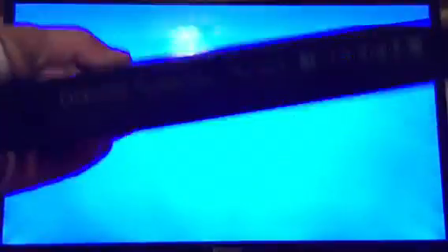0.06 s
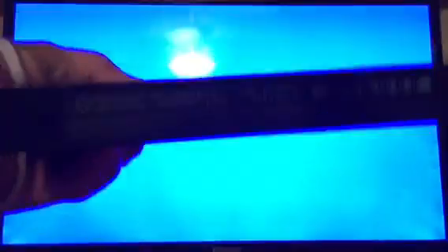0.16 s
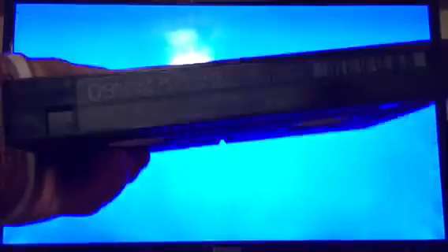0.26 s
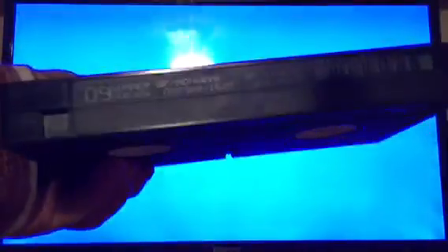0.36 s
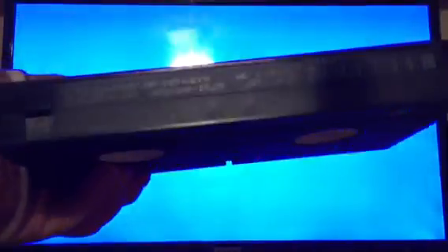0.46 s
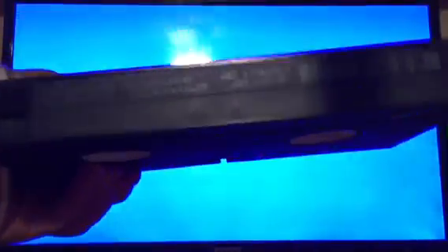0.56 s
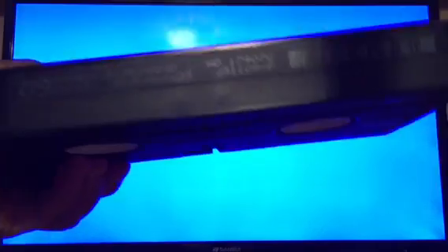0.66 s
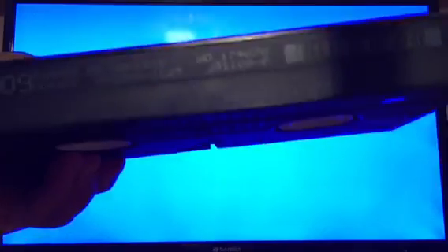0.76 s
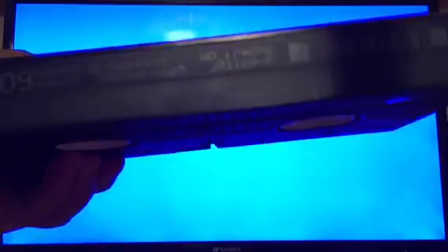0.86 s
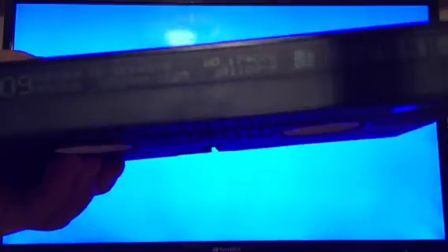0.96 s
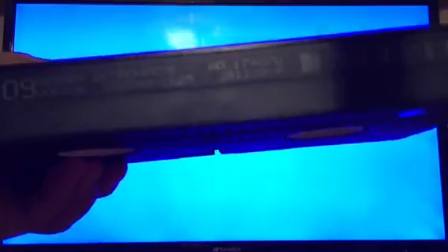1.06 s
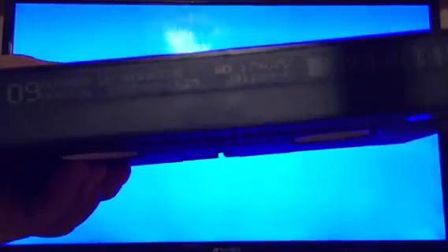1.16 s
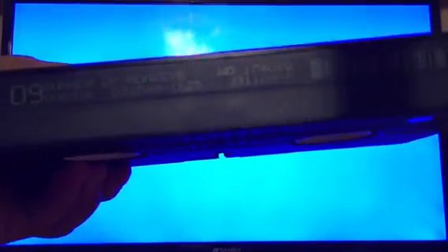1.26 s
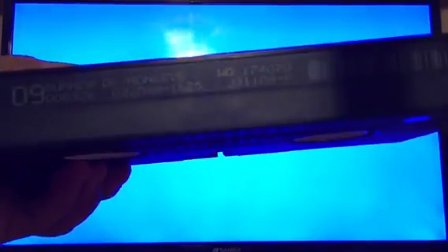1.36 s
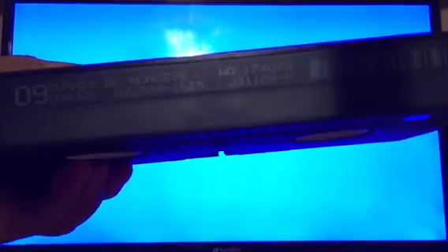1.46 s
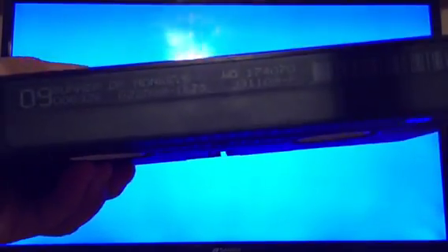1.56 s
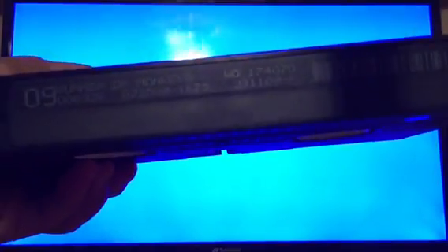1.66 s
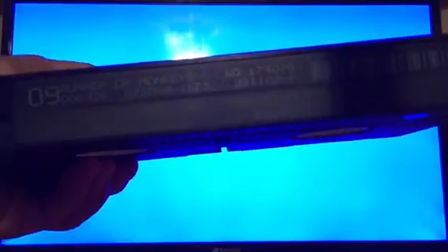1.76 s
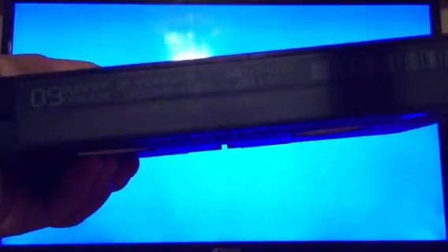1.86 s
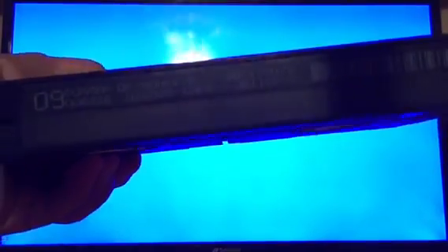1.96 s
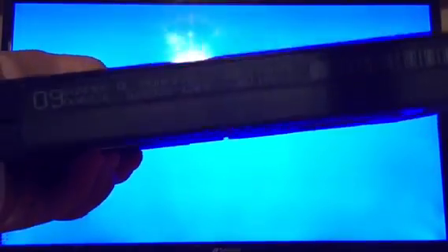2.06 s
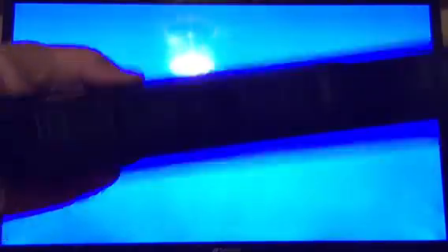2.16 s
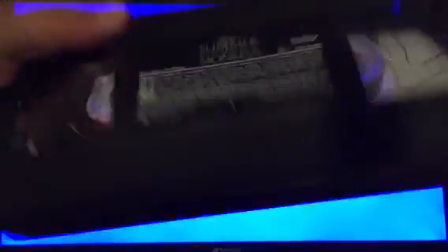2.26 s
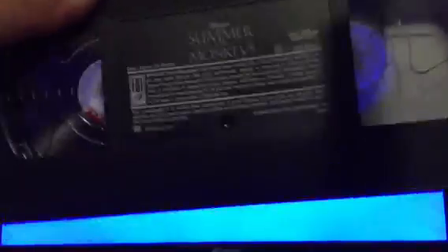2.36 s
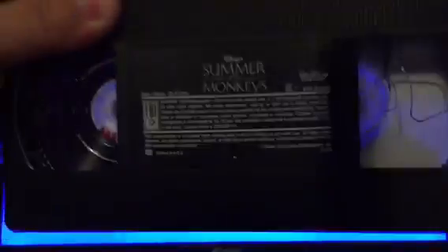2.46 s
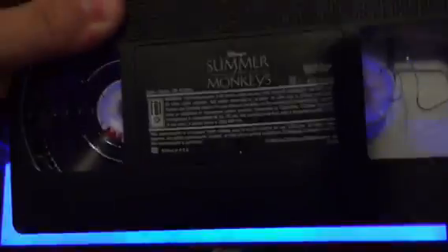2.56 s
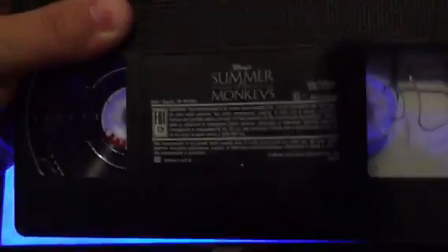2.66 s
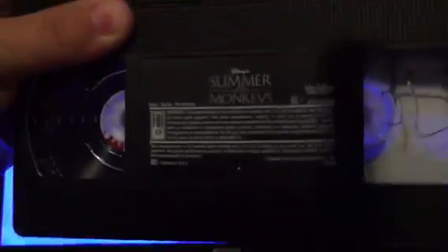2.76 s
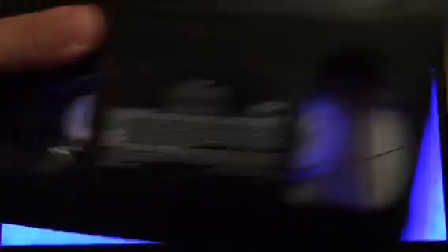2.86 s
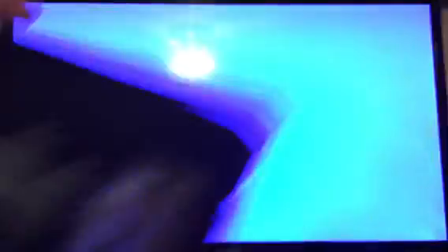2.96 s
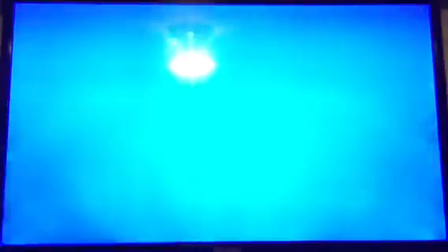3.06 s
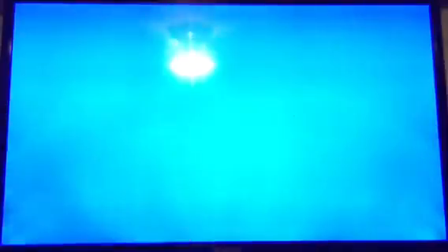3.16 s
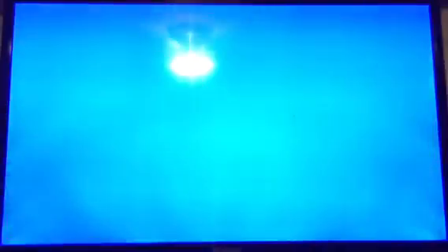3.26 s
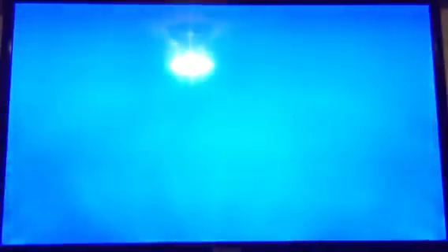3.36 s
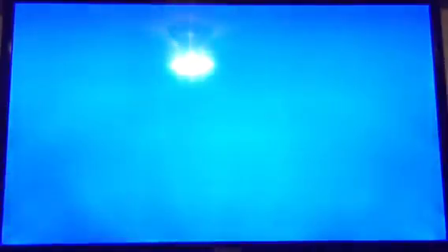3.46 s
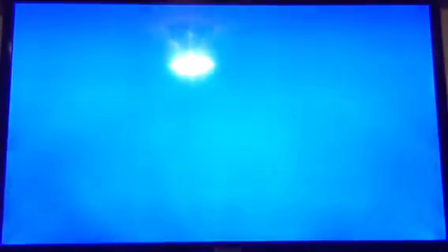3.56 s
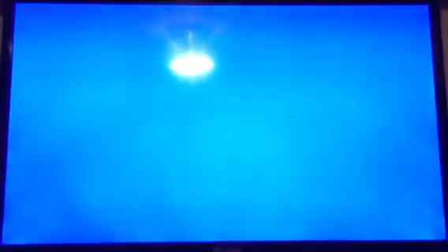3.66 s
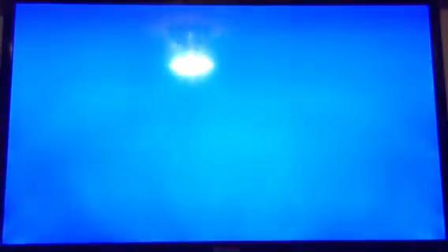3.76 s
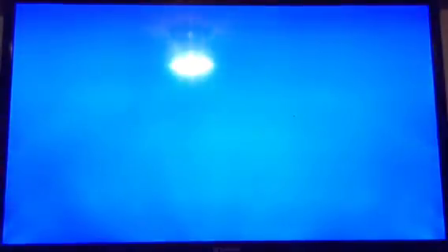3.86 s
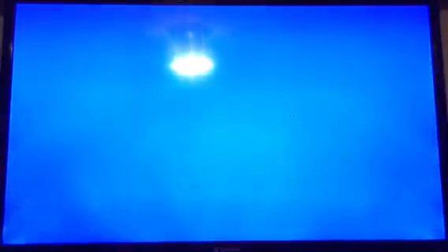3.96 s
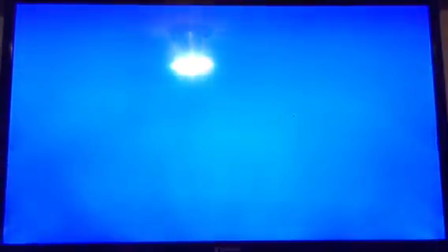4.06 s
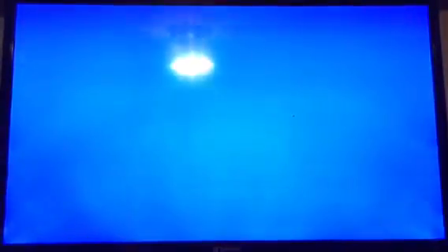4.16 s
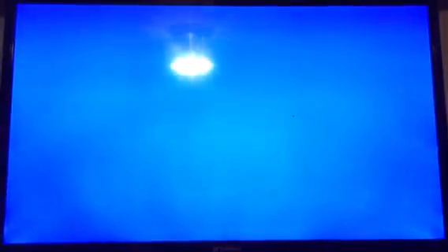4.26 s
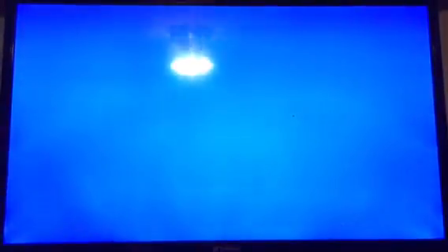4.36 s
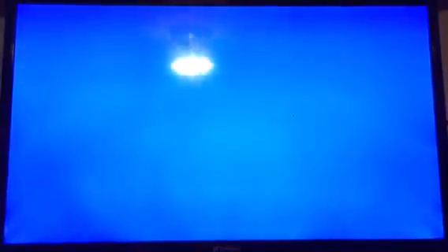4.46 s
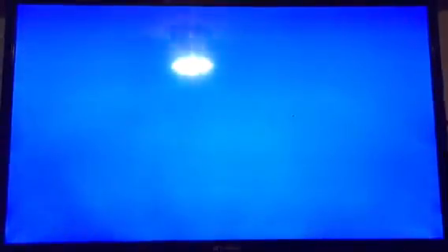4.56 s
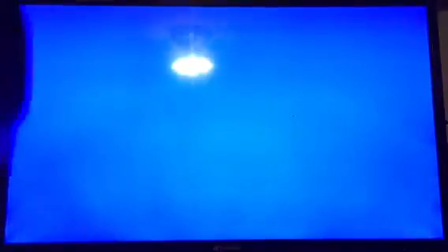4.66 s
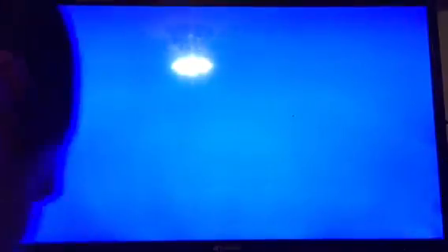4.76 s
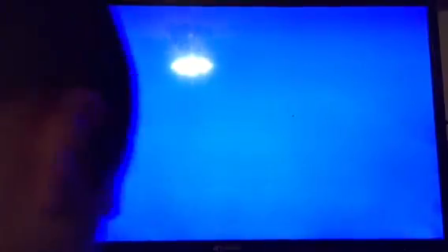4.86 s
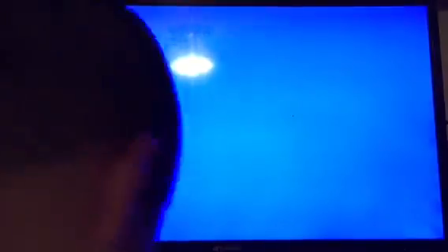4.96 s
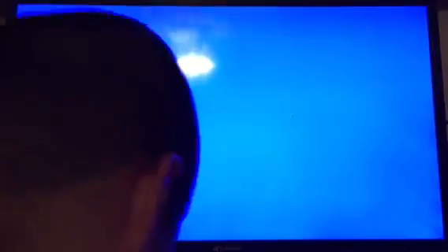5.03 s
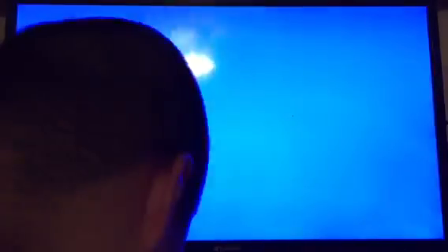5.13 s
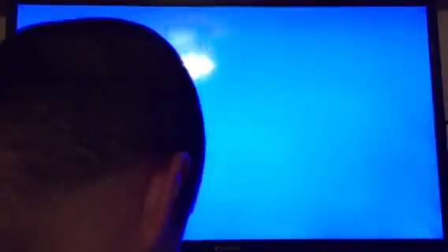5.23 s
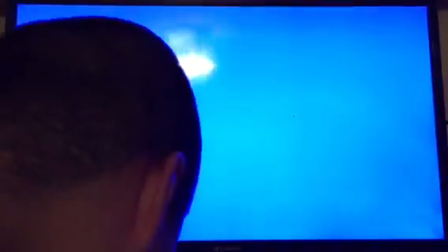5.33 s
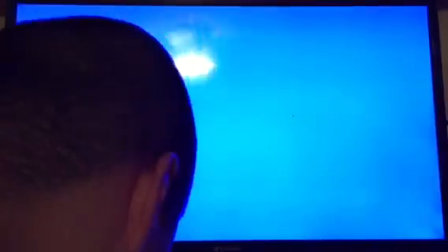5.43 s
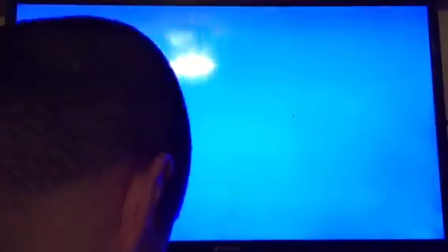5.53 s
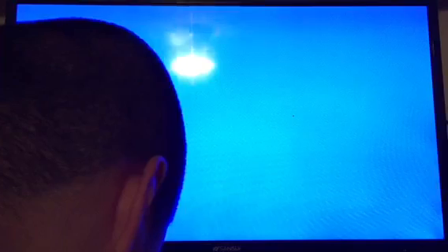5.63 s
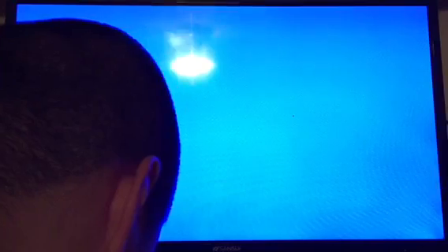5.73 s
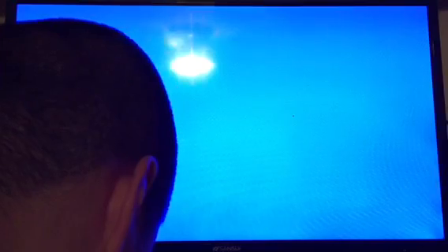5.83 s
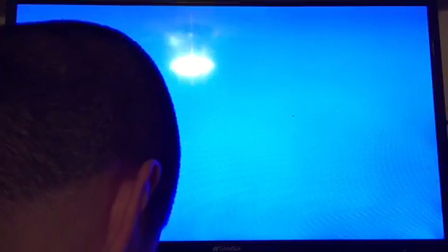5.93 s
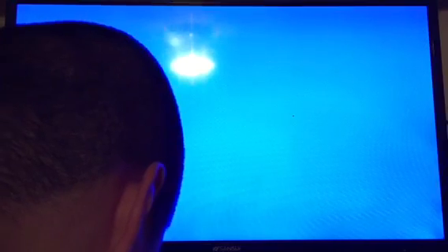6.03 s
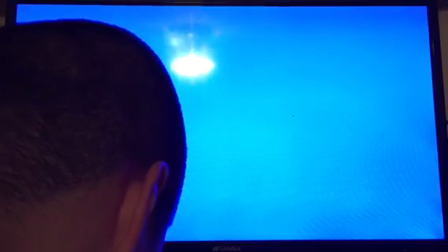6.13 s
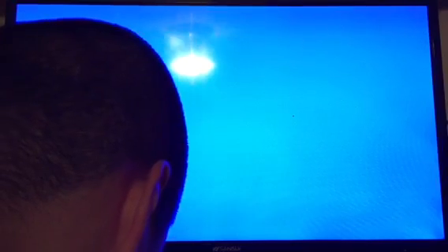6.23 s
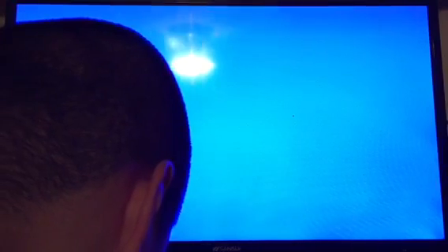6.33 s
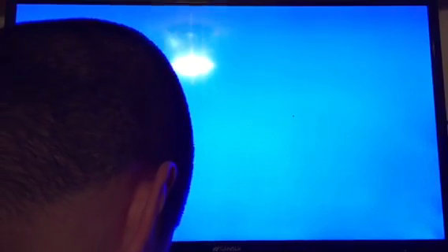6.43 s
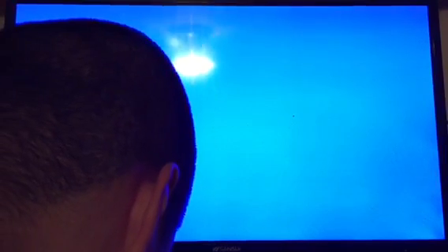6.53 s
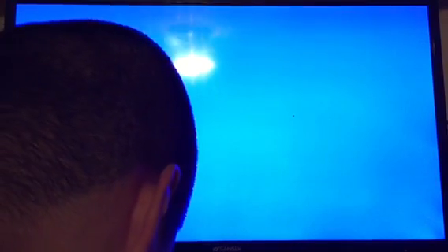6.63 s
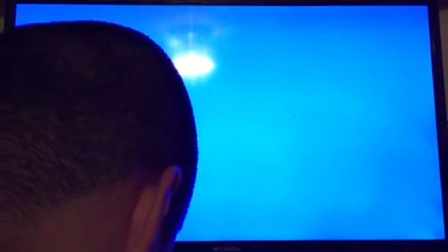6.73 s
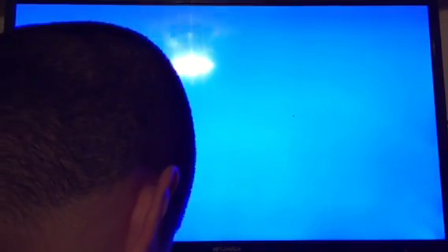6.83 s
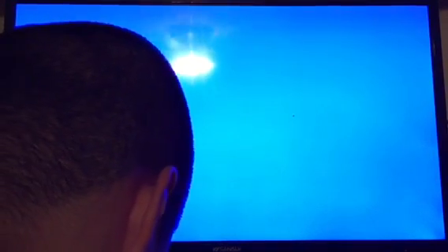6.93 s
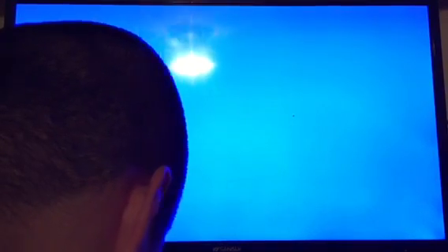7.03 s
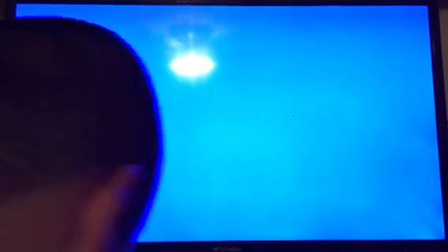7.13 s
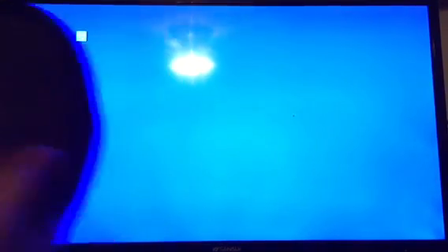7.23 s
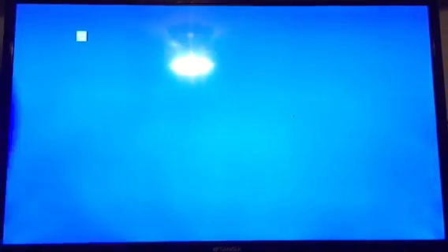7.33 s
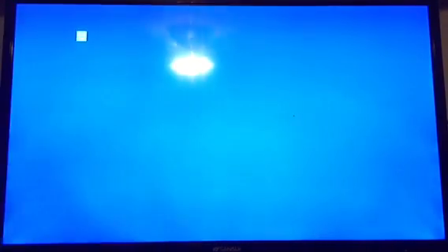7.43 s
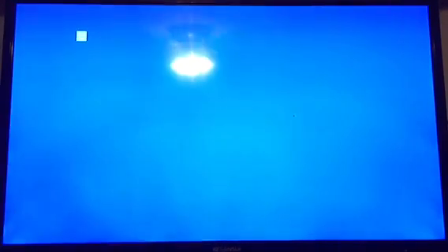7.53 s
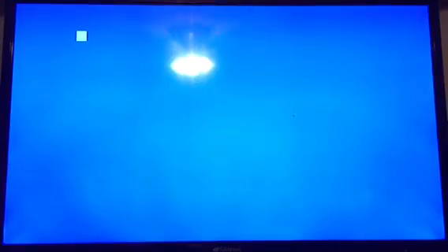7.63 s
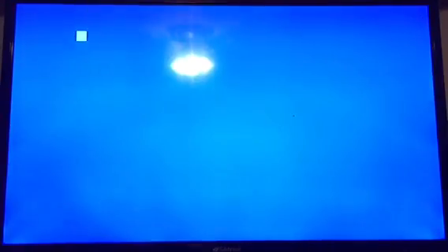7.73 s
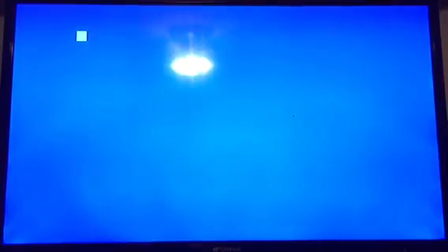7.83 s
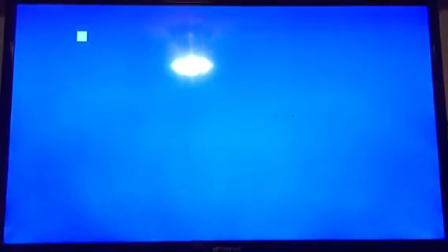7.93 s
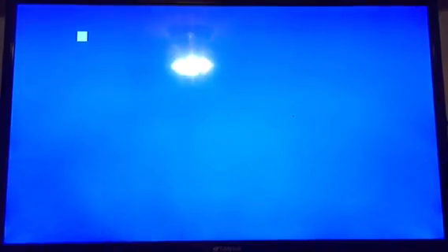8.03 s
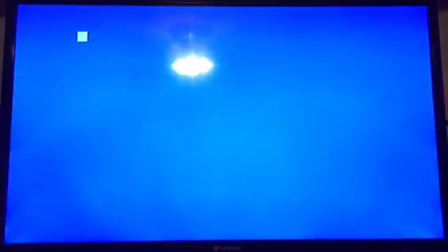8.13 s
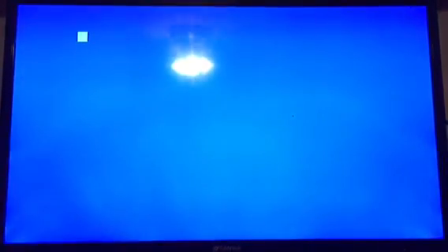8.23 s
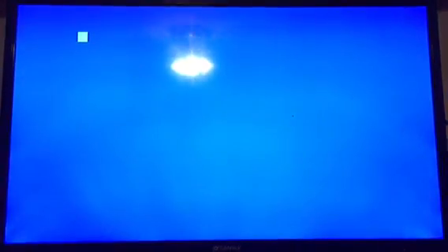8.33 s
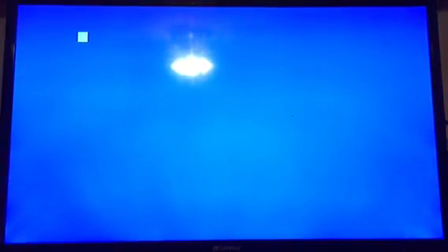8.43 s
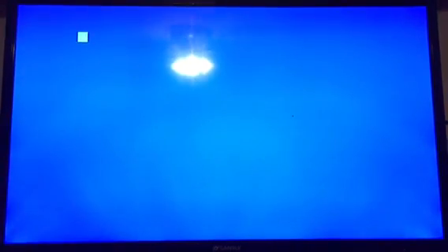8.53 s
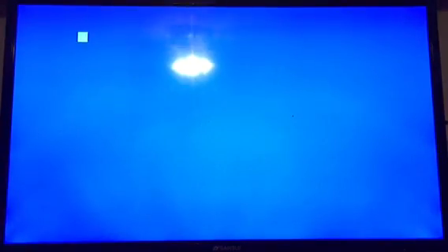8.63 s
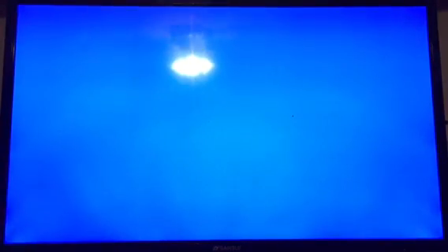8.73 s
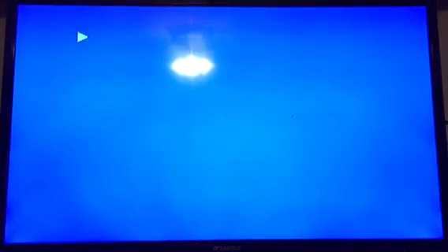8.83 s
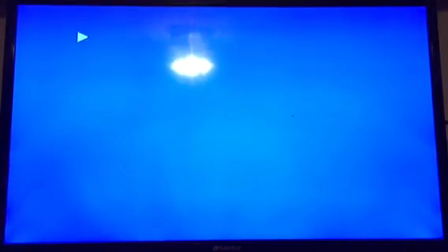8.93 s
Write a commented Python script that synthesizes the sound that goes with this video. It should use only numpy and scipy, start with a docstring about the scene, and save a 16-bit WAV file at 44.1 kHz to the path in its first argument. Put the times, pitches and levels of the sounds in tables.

```python
"""A video cassette is pushed into a player: it knocks the tray, scrapes and squeaks along the slot,
and the metal case booms. Impacts and friction supply the force; the resonances of each body colour it.
Beforehand the cassette clicks and rustles in the hand; afterwards the player's loading parts click,
with soft brushing near the microphone. A small room reverberates, over a faint mains hum,
a fan and a thin motor whine."""
import sys
import numpy as np
from scipy import signal
from scipy.fft import rfft, irfft, next_fast_len
from scipy.io import wavfile
from scipy.ndimage import uniform_filter1d, map_coordinates

SR = 44100
rng = np.random.default_rng(int(sys.argv[2]) if len(sys.argv) > 2 else 0)


def transcribe(u):
    """Save the signal u as a 16-bit wav file named by the first command-line argument.

    u: samples, shape (n,) or (channels, n), limited to [-1, 1]; the rate is SR.
    q: integer samples, one column per channel.
    """
    v = np.clip(np.atleast_2d(u).T, -1, 1)
    q = np.round(v * 32767).astype(np.int16)
    wavfile.write(sys.argv[1], SR, q)


N = 396459
TIME = np.arange(N) / SR
FRAME, ONSET_S = 32768, .025  # samples computed for one contact; time of the blow within them
LN_1000 = np.log(1000)  # amplitude decay of 60 dB

# resonances of the cassette's shell: f/Hz, bandwidth/Hz, gain/dB
SHELL_MODES = [(372, 36, 4), (585, 30, 4), (770, 150, 6.5), (963, 42, 9), (1285, 50, 6.5), (1826, 64, 9),
               (2100, 120, 5), (2360, 110, 3.5), (2750, 60, -5.5), (3140, 69, -2), (5500, 290, 7),
               (6024, 87, 10), (6710, 100, 11), (9320, 720, 8.5)]
# resonances of the player's case and tray: f/Hz, bandwidth/Hz, gain/dB
CASE_MODES = [(147, 17, 0.5), (201.5, 11, 1), (296, 16, 2.5), (303, 10.5, 3.5), (648, 28, 9.5),
              (696, 12, 5.5), (813, 22, 6), (875, 51, 3), (930, 2.4, 1), (1010, 27, 3.5), (1145, 22, 2.5),
              (1510, 3.6, -2), (1860, 15, 5), (2155, 7, 9), (2010, 29, -9), (2310, 16, -11), (2420, 16, 6),
              (6230, 770, 1)]
# the cassette slides in and is drawn down, one list a stroke: t/s, scrape level/dB, boom level/dB
STROKES = [
    [(5.2, -27.5, -32), (5.38, -44.5, -49), (5.54, -36.5, -39), (5.636, -45, -54), (5.694, -33, -53),
     (5.782, -65, -37.5), (5.828, -70, -42), (5.92, -97, -75)],
    [(6.06, -52, -60), (6.162, -56, -60), (6.272, -76, -62), (6.42, -76, -68)],
    [(6.68, -59, -55), (6.758, -57.5, -55), (6.952, -69, -51.5), (7.16, -48, -42.5), (7.276, -47, -42),
     (7.33, -42.5, -33), (7.428, -46, -38), (7.486, -54.5, -49), (7.62, -72, -49.5)],
    [(8.18, -67, -62), (8.5, -72, -60.5), (8.72, -65, -54), (8.99, -79, -66)],
]
# spectrum of a contact: f/Hz, click level/dB, knock level/dB, share of weight, share of brightness
CONTACT_SPECTRUM = [(235, -3, 8.5, 0.79, 0.28), (800, 1, 5, 0.5, 0), (2640, -0.5, -0.5, 0, 0.02),
                    (4200, -4, -5, 0, 0.42), (5800, -12.5, -9, 0.2, 0.66), (9900, -23, -16.5, 0.22, 1.1),
                    (14000, -22.5, -21.5, 0.089, 1.5)]


def amp(db):
    """Amplitude ratio of a level in decibels."""
    return 10 ** (np.asarray(db) / 20)


def unit(x):
    """Normalisation to rms 1."""
    return x / np.sqrt(np.mean(x ** 2) + 1e-20)


def along(points, hz):
    """Interpolation of (f/Hz, value) points on a logarithmic frequency axis."""
    f, values = np.transpose(points)
    return np.interp(np.log(hz + 1), np.log(f + 1), values)


def wobble(rate):
    """Smooth random modulation: a spline through `rate` random knots a second."""
    knots = rng.standard_normal(int(N * rate / SR) + 4)
    return map_coordinates(knots, [TIME * rate])


def filtered(x, gain):
    """Zero-phase filtering: the spectrum of x is multiplied by gain(f)."""
    size = next_fast_len(N + SR // 2)
    return irfft(rfft(x, size) * gain(np.fft.rfftfreq(size, 1 / SR)), size)[:N]


def resonant(modes, hz):
    """Gain of a resonator: Lorentzian peaks add in power above a flat response."""
    peaks = sum(amp(db) ** 2 / (1 + (2 * (hz - centre) / width) ** 2) for centre, width, db in modes)
    return np.sqrt(1 + peaks)


def coloured(force, spectrum, modes=()):
    """Source and filter: a force shaped by a broad spectrum and any resonances, at rms 1."""
    return unit(filtered(force, lambda hz: amp(along(spectrum, hz)) * resonant(modes, hz)))


def causal(gain):
    """Causality: the minimum-phase response with this gain rings only after the blow."""
    cepstrum = irfft(np.log(np.maximum(gain, 1e-6)))
    cepstrum[1:FRAME // 2] *= 2
    cepstrum[FRAME // 2 + 1:] = 0
    return np.exp(rfft(cepstrum))


def add(track, start, sound):
    """Superposition of a sound on the track from `start` seconds."""
    part = track[max(round(start * SR), 0):][:len(sound)]
    part += sound[:len(part)]


def background():
    """Broadband fan noise under a line spectrum: mains, fan and motor tones of wavering phase."""
    # noise of fan and room: f/Hz, relative level/dB
    air_spectrum = [(25, -40), (45, -10), (92, -8), (125, -5.5), (205, -4), (270, -8), (335, -10),
                    (430, -13.5), (1020, -12.5), (1560, -18), (2000, -17), (2690, -24.5), (6000, -32),
                    (16000, -39)]
    # mains and fan tones: f/Hz, relative level/dB
    hum_lines = [(60, -74), (120, -79), (333, -78), (996, -80), (1163, -83), (1497, -84), (1830, -86)]
    # a small motor, loudest once the player is in use: t/s, level/dB
    whine_levels = [(0, -79.5), (4.5, -76), (6, -78.5), (7.5, -65), (8.1, -75), (9, -71)]

    def tone(hz):
        return np.sqrt(2) * np.sin(2 * np.pi * hz * TIME + 0.99 * wobble(7.3))

    air = coloured(rng.standard_normal(N), air_spectrum)
    hum = sum(amp(db) * tone(hz) for hz, db in hum_lines)
    whine = amp(np.interp(TIME, *np.transpose(whine_levels))) * tone(hz=1330)
    return amp(-64.5) * air + amp(1.5) * hum + whine


def room_tail(build_s):
    """Reverberation: a diffuse field of energy 1 builds up and decays, the treble first."""
    # reverberation time of the room: f/Hz, T60/s
    decay_times = [(100, 0.58), (300, 0.41), (800, 0.31), (2500, 0.35), (6000, 0.28), (14000, 0.25)]
    hz, t, noise = signal.stft(rng.standard_normal(FRAME), SR, nperseg=256)
    decay = amp(-60 * t / along(decay_times, hz)[:, None])
    rise = 1 - np.exp(-(t / build_s) ** 2)
    _, tail = signal.istft(noise * decay * rise, SR)
    return unit(tail[:FRAME]) / np.sqrt(FRAME)


def friction(grain_db, grain_rate):
    """Stick-slip friction breaks noise into grains."""
    return rng.standard_normal(N) * amp(grain_db * wobble(grain_rate))


def brushing():
    """Friction of skin and cloth excites the plastic's modes and hisses over its texture."""
    # brief touches: t/s, duration/s, rub level/dB, hiss level/dB
    brushes = [(3.554, 0.19, -58.5, -53), (4.78, 0.073, -76, -56.5), (7.546, 0.18, -52.5, -60),
               (8.217, 0.36, -53, -61), (8.305, 0.041, -71, -76), (8.33, 0.056, -52, -74),
               (8.796, 0.14, -67, -50.5), (8.892, 0.14, -56.5, -76)]
    # skin rubbing on plastic: f/Hz, relative level/dB
    rub_spectrum = [(200, -3), (700, 4), (1400, 5), (2300, 6.5), (4000, -2), (7000, -18.5), (15000, -21.5)]
    # hiss of the sleeve: f/Hz, relative level/dB
    sleeve_spectrum = [(500, -29), (2000, 8), (4000, 1.5), (7000, 1), (10000, -3.5), (15000, -5)]
    rub = coloured(friction(grain_db=3.5, grain_rate=260), rub_spectrum, SHELL_MODES)
    hiss = coloured(rng.standard_normal(N), sleeve_spectrum)
    out = np.zeros(N)
    for start, length, rub_db, hiss_db in brushes:
        envelope = np.interp((TIME - start) / length, [0, .2, .65, 1], [0.0015, 0.41, 0.24, 0.032])
        out += envelope * (amp(rub_db) * rub + amp(hiss_db) * hiss)
    return out


def squeaks():
    """Self-excited oscillation: stick and slip lock briefly onto one resonance of the tray."""
    # the shell catching on the guides: t/s, duration/s, f/Hz, peak level/dB
    catches = [(5.246, 0.023, 1125, -28), (5.267, 0.039, 1156, -29.5)]
    out = np.zeros(N)
    for start, length, hz, db in catches:
        envelope = np.interp((TIME - start) / length, [0, .3, .6, 1], [0.0016, 0.83, 1.0, 0.0038])
        out += amp(db) * envelope * np.sin(2 * np.pi * hz * TIME + 0.55 * wobble(200))
    return out


def jolts(per_second=9, boost_db=4):
    """Random excitation by the moving cassette, following the boom: rows of t/s, f/Hz, level/dB."""
    # low modes of the case: f/Hz, relative level/dB
    low_modes = [(128, 3), (308, -1)]
    rows = []
    for stroke in STROKES:
        times, _, boom_db = np.transpose(stroke)
        for slot, (late, pick) in enumerate(rng.random((32, 2))):
            start = times[0] + (slot + late) / per_second
            hz, db = low_modes[int(pick * len(low_modes))]
            if start < times[-1]:
                rows.append((start, hz, db + boost_db + np.interp(start, times, boom_db)))
    return rows


def bumps(attack_s=0.012):
    """Damped oscillation: each soft push or jolt rings one mode; the lower it is, the longer it rings."""
    # soft bumps of hands, case and shelf: t/s, f/Hz, level/dB
    pushes = [(0.918, 126, -53), (1.371, 127, -49.5), (2.986, 383, -43), (4.946, 94, -40),
              (5.013, 60.4, -34.5), (5.184, 311, -18.5), (5.188, 109, -30.5), (5.612, 145, -28),
              (5.663, 298, -25.5), (6.172, 310.5, -33), (6.289, 84.6, -44.5), (6.918, 316, -29.5),
              (6.921, 129, -41), (6.969, 344, -37.5), (7.275, 307, -33), (7.346, 125, -32),
              (7.432, 240, -36.5), (7.465, 56, -44), (7.719, 271, -24), (7.968, 133, -47.5),
              (8.209, 85, -51), (8.289, 46.7, -44.5), (8.644, 306, -41), (8.709, 106, -51.5),
              (8.809, 64, -50), (8.802, 233, -35.5), (8.839, 155, -44)]
    out, t = np.zeros(N), np.arange(SR // 2) / SR
    phase_drift = 0.81 * wobble(60)
    for start, hz, db in pushes + jolts():
        t60 = .105 * (300 / hz) ** 0.24
        envelope = (1 - np.exp(-t / attack_s)) * np.exp(-LN_1000 * t / t60)
        phase = 2 * np.pi * hz * t + np.roll(phase_drift, -round(start * SR))[:len(t)]
        add(out, start, 2 * amp(db) * envelope * np.sin(phase))
    return out


def sliding(ramp_s=0.043, gain_db=-5):
    """Forced vibration: the shell scrapes along the guides and shakes the hollow case."""
    # scraping in the guides: f/Hz, relative level/dB
    scrape_spectrum = [(260, -66.5), (450, -36), (664, 0), (1010, 0), (1680, 2), (3700, -11.5), (5970, -17),
                       (14200, -35), (16000, -56)]
    # boom of the case: f/Hz, relative level/dB
    boom_spectrum = [(40, -19), (80, -8), (125, 2), (200, -5), (330, -1.5), (430, -8.5), (700, -34),
                     (2000, -98)]
    scrape_envelope, boom_envelope = np.zeros(N), np.zeros(N)
    for stroke in STROKES:
        times, scrape_db, boom_db = np.transpose(stroke)
        touching = np.clip(np.minimum(TIME - times[0], times[-1] - TIME) / ramp_s, 0, 1)
        scrape_envelope += touching * amp(np.interp(TIME, times, scrape_db))
        boom_envelope += touching * amp(np.interp(TIME, times, boom_db))
    scrape = coloured(friction(grain_db=2.5, grain_rate=160), scrape_spectrum, CASE_MODES)
    boom = coloured(friction(grain_db=-2, grain_rate=48), boom_spectrum, CASE_MODES)
    return amp(gain_db) * (scrape_envelope * scrape + boom_envelope * boom)


def treble_ripple(hz, depth_db=4.0, spacing_hz=222.5):
    """Spectral colouration: a fine random ripple in the treble gives each contact its own timbre."""
    ripple = map_coordinates(rng.standard_normal(FRAME // 32), [hz / spacing_hz], mode="mirror")
    return amp(depth_db * np.clip(hz / 3000, 0, 1) * ripple)


def contacts(events, modes, tone, plain_db, settle_s, settle_power, spiky, spot_q, spot_db,
             room_db, build_s):
    """Impact excitation: bursts of tiny blows ring body and room; weight adds bass, brightness treble."""
    out, t, hz = np.zeros(N), np.arange(FRAME) / SR - ONSET_S, np.fft.rfftfreq(FRAME, 1 / SR)
    body = resonant(modes, hz) * amp(along(tone, hz)) / np.hypot(1, amp(room_db))
    band_hz, _, _, weight_share, bright_share = np.transpose(CONTACT_SPECTRUM)
    for when, rise_s, db, weight_db, bright_db, spot_hz in events:
        # the parts graze, meet and settle; a rise of 2 ms takes settle_s to die away, a slower one longer
        t60 = settle_s * (rise_s / .002) ** settle_power
        envelope = np.exp(np.minimum(t / rise_s, -LN_1000 * t / t60))
        chatter = rng.standard_normal(FRAME)
        spikes = np.exp(spiky * np.repeat(rng.standard_normal(FRAME // 16), 16))
        burst = rfft(chatter * spikes * envelope)
        # divided by its smoothed magnitude, the burst feeds all bands evenly
        magnitude = np.sqrt(np.abs(uniform_filter1d(np.abs(burst) ** 2, size=401)) + 1e-12)
        spot = resonant([(spot_hz, spot_hz / spot_q, spot_db)], hz)
        direct = burst * causal(spot * treble_ripple(hz) / magnitude)
        # the room gathers radiation from all directions, so the spot's resonance stands out less
        tail = np.roll(room_tail(build_s), round(ONSET_S * SR))
        reverberant = amp(room_db) * rfft(tail) * causal(spot ** 0.44)
        band_db = plain_db + weight_db * weight_share + bright_db * bright_share
        colour = amp(db + along(list(zip(band_hz, band_db)), hz))
        sound = irfft((direct + reverberant) * causal(body * colour))
        add(out, when - ONSET_S, sound[:FRAME * 3 // 4])
    return out


def plastic_clicks():
    """Light impacts ring the modes of the plastic; direct sound dominates over the room."""
    # loose reels and dust flap of the hand-held cassette and, later, the player's loading parts:
    # t/s, rise time/s, level/dB, weight/dB, brightness/dB, f/Hz of the touched spot
    clicks = [(0.143, 0.00013, -18, -10, 7, 2100), (0.202, 0.00069, -10, -11, -1, 790),
              (0.244, 0.0015, -5.5, -9, -1, 2750), (0.563, .0005, -33, 10, -2, 2380),
              (0.999, 0.00069, -24, -3, -3, 2470), (2.376, 0.0047, -11.5, 0, -1, 7300),
              (2.429, 0.0023, -3, -13, -6, 2390), (2.486, 0.0013, -9, -3, 3.5, 2370),
              (2.967, 0.0044, -9.5, -3, -8, 2300), (2.989, 0.00073, -15, 20, -10, 2220),
              (3.096, 0.005, -23.5, 9, -4, 5720), (3.134, 0.0039, -12.5, -15, -12, 1960),
              (3.182, .0003, -33, -13, 16.5, 2690), (3.224, .003, -14, -11, -6, 3760),
              (3.254, 0.0012, -23.5, 0, 3, 5900), (3.366, 0.0014, -16, -8, -7, 2340),
              (3.465, 0.00085, -5.5, 10.5, -5, 2060), (3.584, 0.00074, -19, 1, 7.5, 661),
              (3.648, 0.011, -8, -7, 1.5, 720), (3.805, 0.0036, -22, 14.5, 2.5, 5430),
              (3.872, 0.0021, -9, 0, -2.5, 1120), (3.8832, 0.00015, 8, -0.5, 9.5, 6020),
              (4.181, 0.0016, -29.5, 0.5, 1, 3220), (8.467, .003, -16, 3, -16, 1316),
              (8.479, 0.00047, -17.5, 10.5, 13, 6650), (8.632, 0.0084, -8.5, -1, -2.5, 1720),
              (8.679, 0.0035, -17, -14, -7.5, 4040), (8.74, 0.0014, -13, -17, -9, 1950),
              (8.797, .006, -22, 30, 4.5, 1020)]
    # spectral envelope of the shell: f/Hz, level/dB
    shell_tone = [(30, -16.5), (120, -13), (260, -6.5), (1500, -4), (2600, -0.5), (4400, -2.5), (6000, -3),
                  (8000, -2), (15500, -5.5)]
    click_db = np.array(CONTACT_SPECTRUM)[:, 1]
    return contacts(clicks, SHELL_MODES, shell_tone, click_db, settle_s=0.073, settle_power=0.36,
                    spiky=0.49, spot_q=17, spot_db=9.5, room_db=-9, build_s=.008)


def player_knocks():
    """Impacts ring the tray and metal case; further off, the reverberant field has a larger share."""
    # the cassette striking the player:
    # t/s, rise time/s, level/dB, weight/dB, brightness/dB, f/Hz of the touched spot
    knocks = [(4.661, 0.0026, -8, -6.5, -1.5, 3380), (4.797, .005, -18.5, -14, 1, 2646),
              (4.972, 0.0047, -9, 5.5, -19.5, 510), (5.09, 0.036, -10, -3.5, -4.5, 2100),
              (5.1725, 0.0007, 2.5, 2, -0.5, 674), (5.1775, 0.00055, 5, 1.5, 4.5, 2254),
              (5.196, 0.0013, -16.5, 29, -3, 661), (5.25, 0.0077, -5.5, -10, 2.5, 1090),
              (5.2825, 0.0036, 4.5, 0, -4, 733), (5.421, .002, -6, -8, -2, 814),
              (5.432, .003, -2.5, -7, 0, 2120), (5.4515, 0.00087, 5, -5.5, 7, 1073),
              (5.47, .0024, -6, 9, 4.5, 1880), (5.578, 0.0047, -2, -2, -4, 1330),
              (5.5965, 0.00074, 5.5, 0, 1, 2580), (5.618, 0.009, -2.5, 9, -7, 834),
              (5.667, 0.0052, -12, 20.5, -1, 1100), (5.705, 0.0069, 0, -9, 1, 760),
              (5.745, 0.0087, -1.5, 4.5, -5, 1560), (6.085, 0.009, -15.5, 5, 1, 810),
              (6.123, 0.023, -7, 5.5, -7, 1280), (6.148, .005, -7, 3, -2, 2110),
              (6.175, 0.00047, -5, 6, -1.5, 1370), (6.241, .0009, -8.5, 3.5, 0, 1270),
              (6.311, .001, -25, 8, -1, 1150), (6.916, .005, -15.5, 17, -3, 1460),
              (7.1, 0.0032, -15, 1, -3.5, 804), (7.137, 0.0097, -6.5, 3, -10, 1450),
              (7.151, .002, 0, -8.5, 2.5, 2700), (7.207, 0.013, -6, -13, -8, 2120),
              (7.3016, .0008, -9, 11, 5.5, 830), (7.331, 0.0048, -4, -9, 9.5, 2610),
              (7.345, 0.0043, -4.5, 6, -5, 933), (7.6838, 0.00055, -0.5, -5.5, 6.5, 1490),
              (7.706, 0.0083, -5.5, 9, -4, 840), (7.7272, 0.0002, 8.5, 3, -11, 900),
              (7.7345, 0.00017, 1.5, 3, -19, 827), (7.875, .005, -20, 1, -28, 960)]
    # spectral envelope of the case: f/Hz, level/dB
    case_tone = [(30, -49), (70, -11), (130, -5.5), (330, 1), (430, -7), (570, -5.5), (700, -4.5),
                 (1500, 0.5), (2500, 0), (4000, -0.5), (6500, -0.5), (8000, 1), (15500, -1)]
    knock_db = np.array(CONTACT_SPECTRUM)[:, 2]
    return contacts(knocks, CASE_MODES, case_tone, knock_db, settle_s=0.076, settle_power=0.3,
                    spiky=0.33, spot_q=36, spot_db=12.5, room_db=-3.0, build_s=0.0045)


def scene():
    """Superposition: the pressures of all sources add in one channel."""
    impacts = plastic_clicks() + player_knocks()
    movement = sliding() + bumps() + squeaks() + brushing()
    return (impacts + movement + background())[None]


def record(dry, low_hz=36., top_hz=15950):
    """Band-pass response: the small microphone loses the deepest bass, and the top is cut off steeply."""
    def response(hz):
        high_pass = hz ** 3 / np.sqrt(hz ** 6 + low_hz ** 6)
        low_pass = 1 / np.sqrt(1 + (hz / top_hz) ** 200)
        return high_pass * low_pass

    return np.array([filtered(channel, response) for channel in dry])


dry = scene()
out = record(dry)
transcribe(out)
```